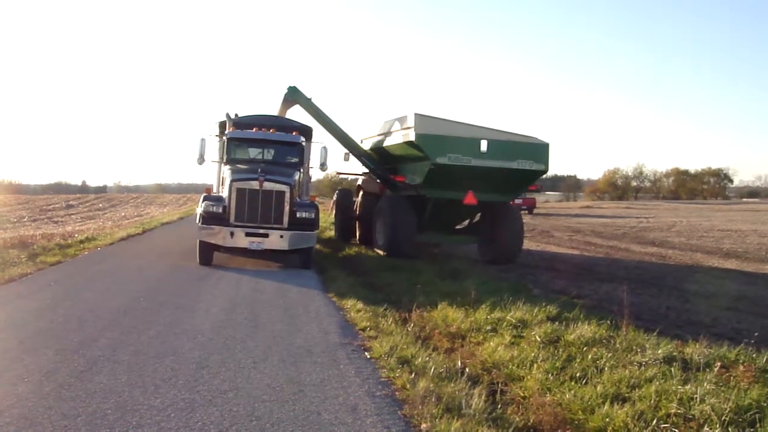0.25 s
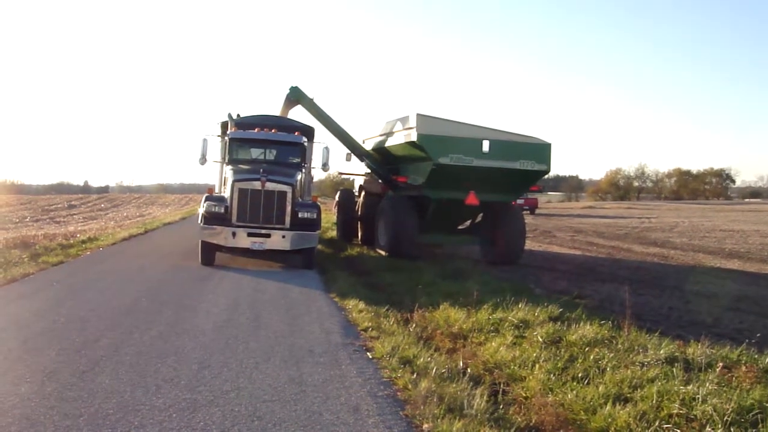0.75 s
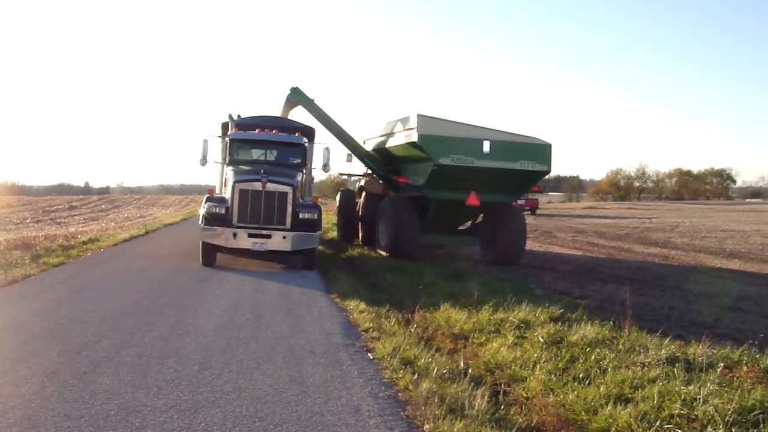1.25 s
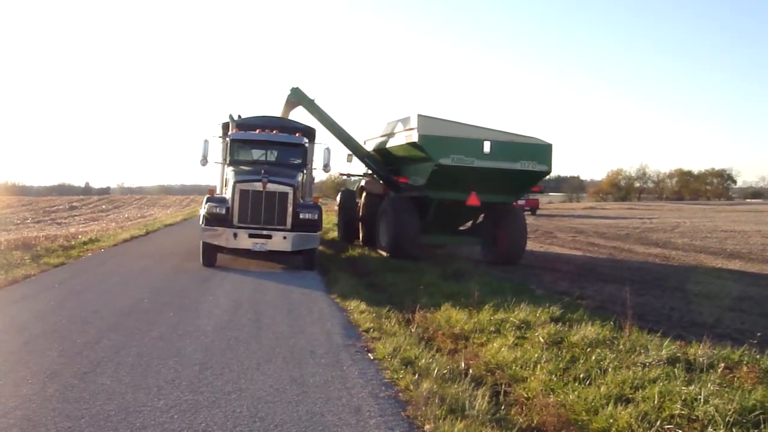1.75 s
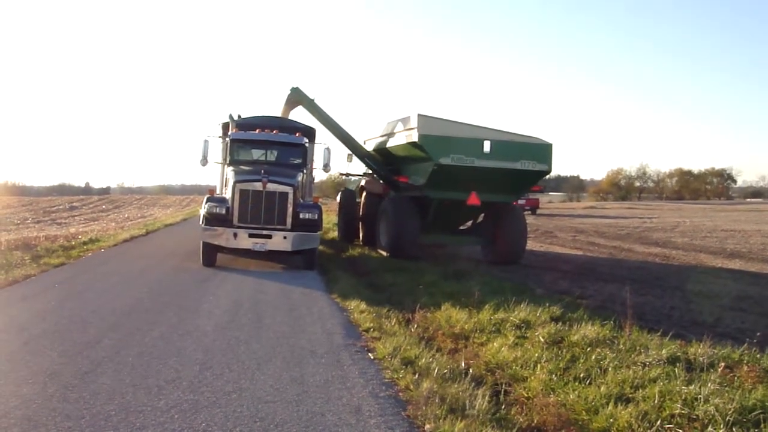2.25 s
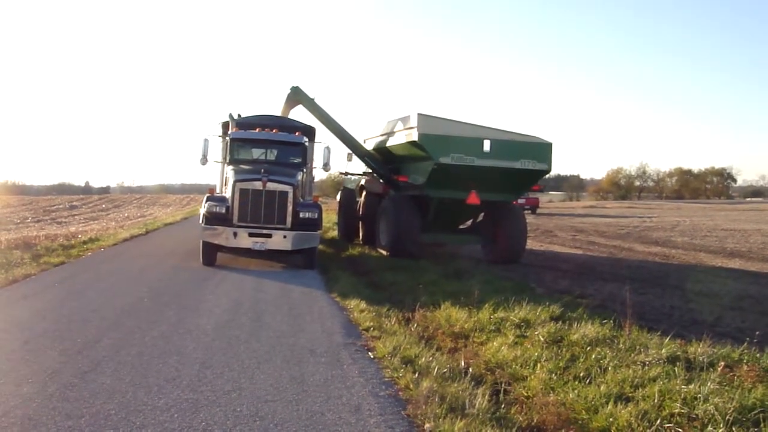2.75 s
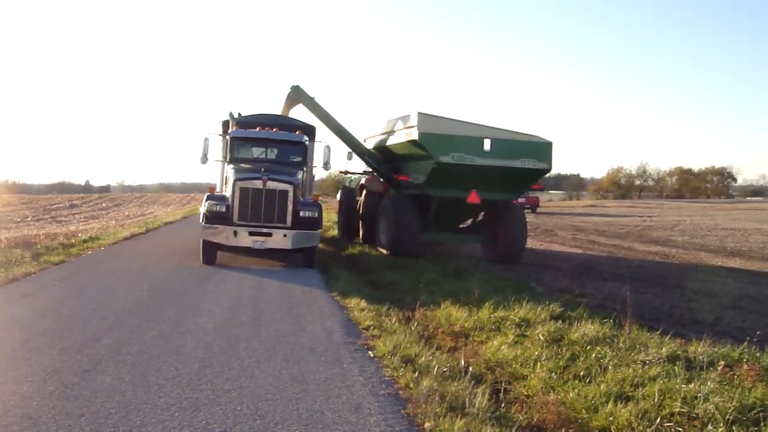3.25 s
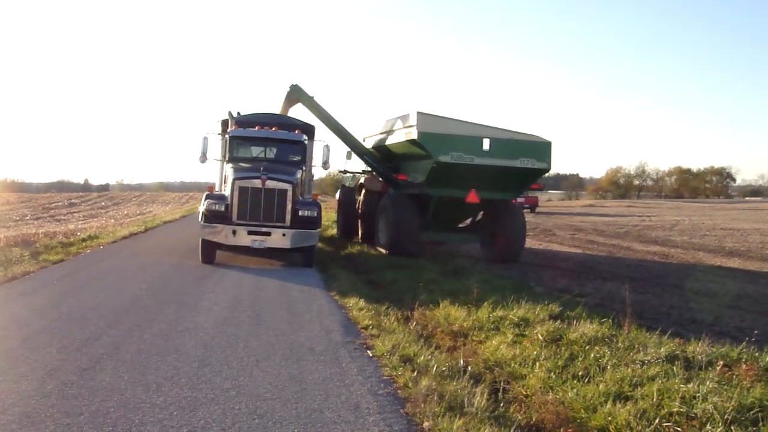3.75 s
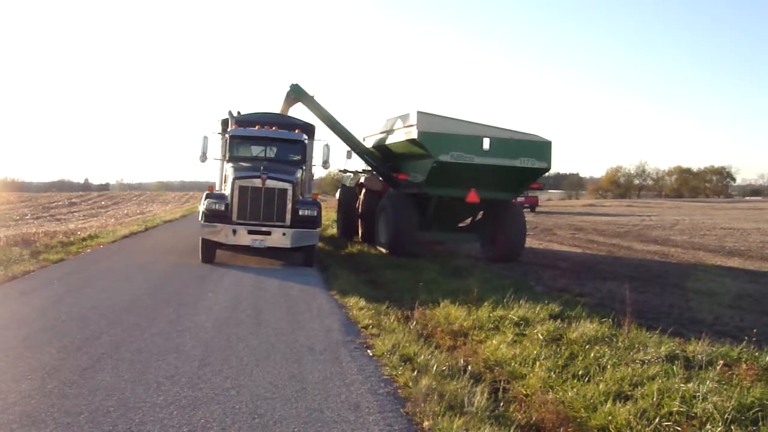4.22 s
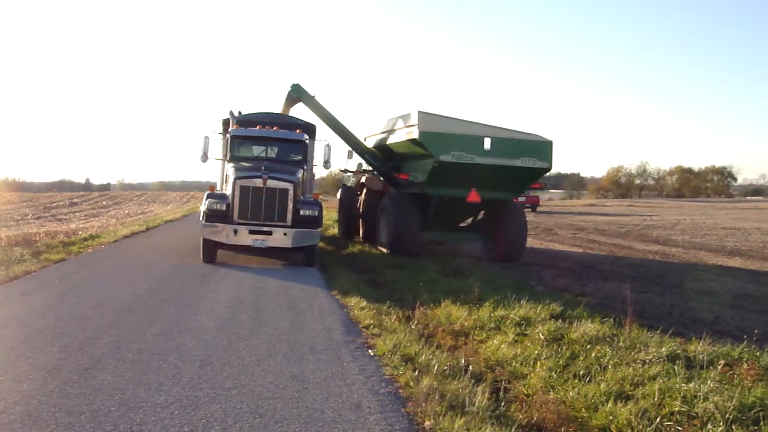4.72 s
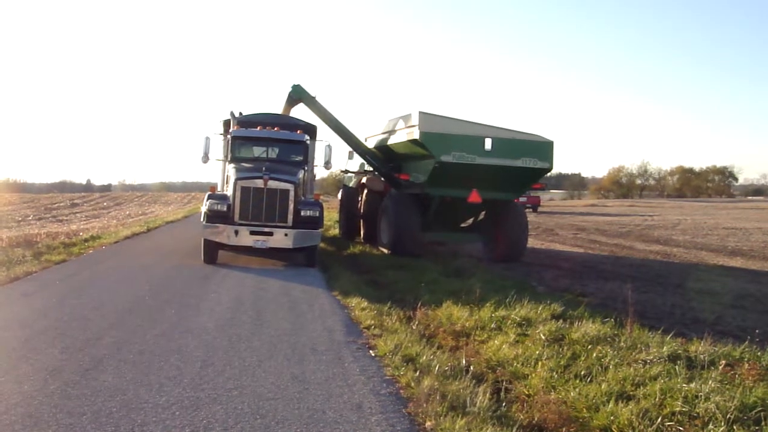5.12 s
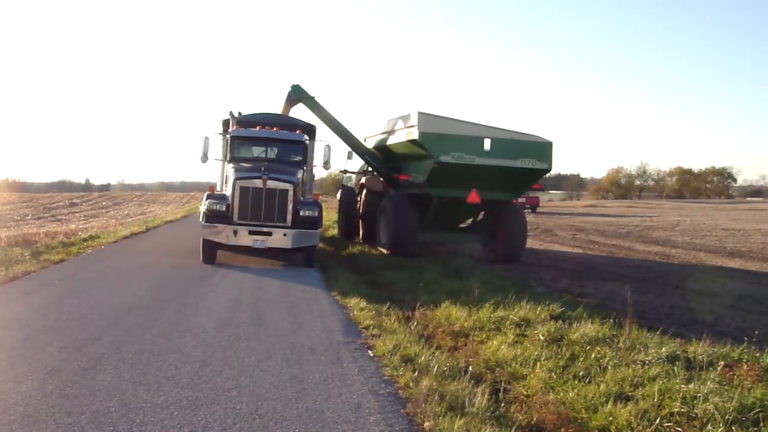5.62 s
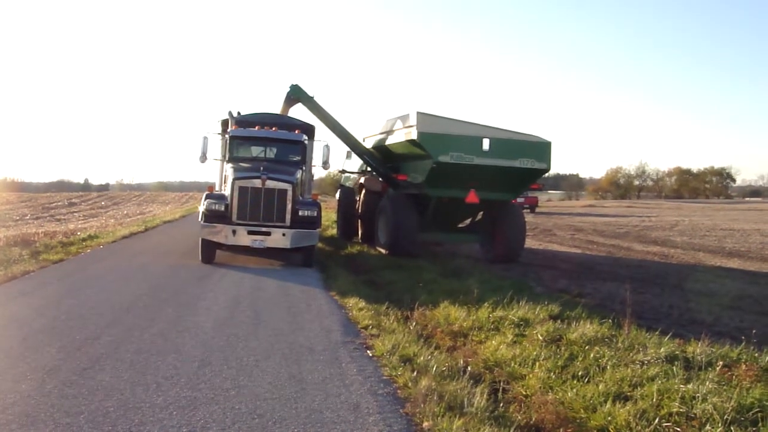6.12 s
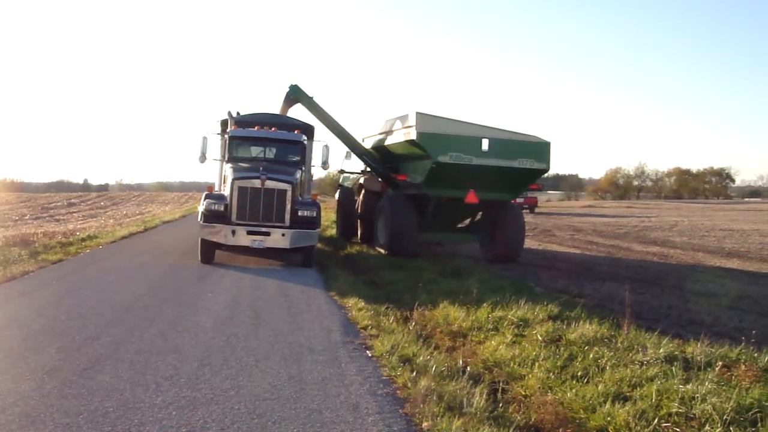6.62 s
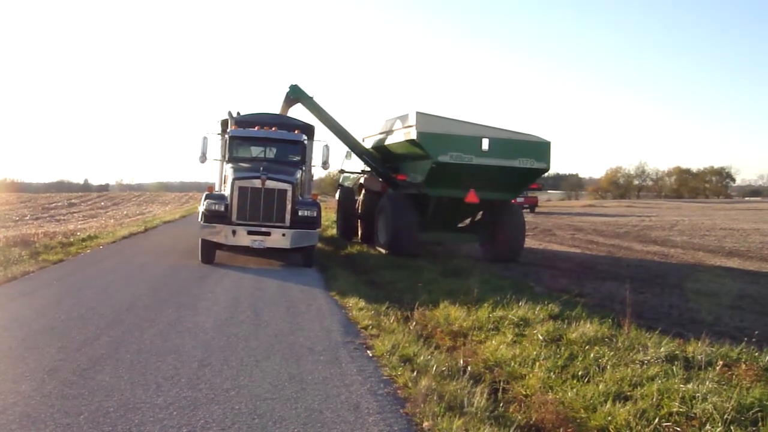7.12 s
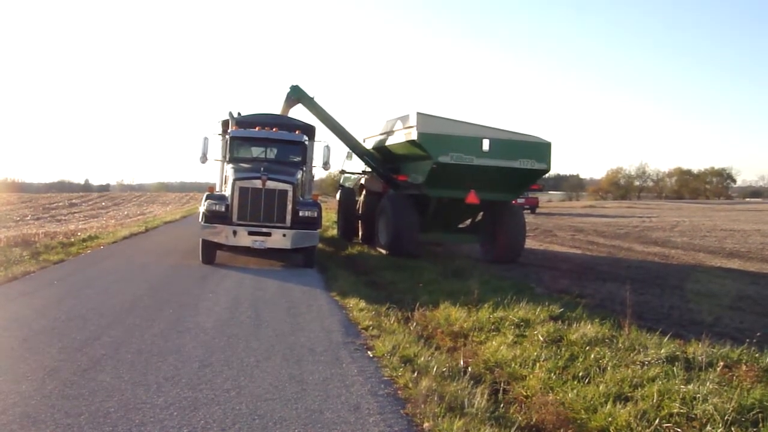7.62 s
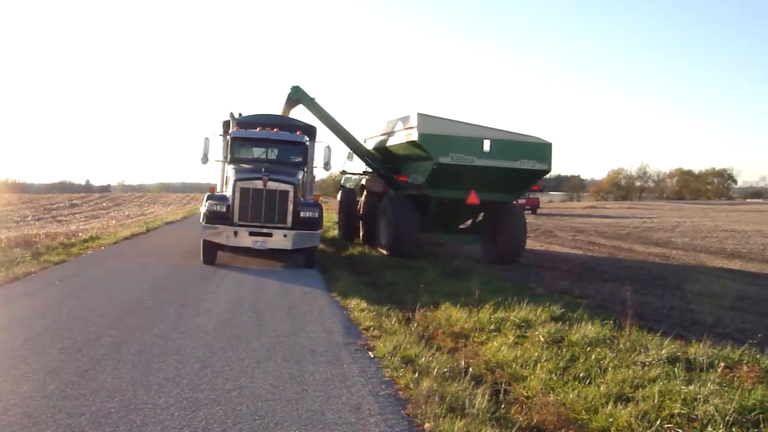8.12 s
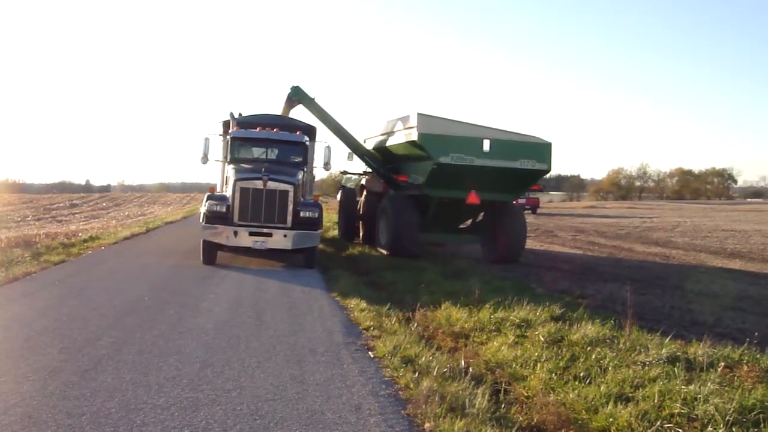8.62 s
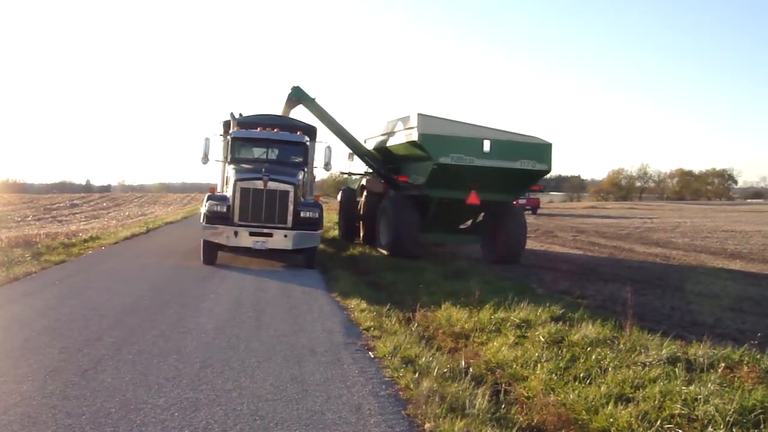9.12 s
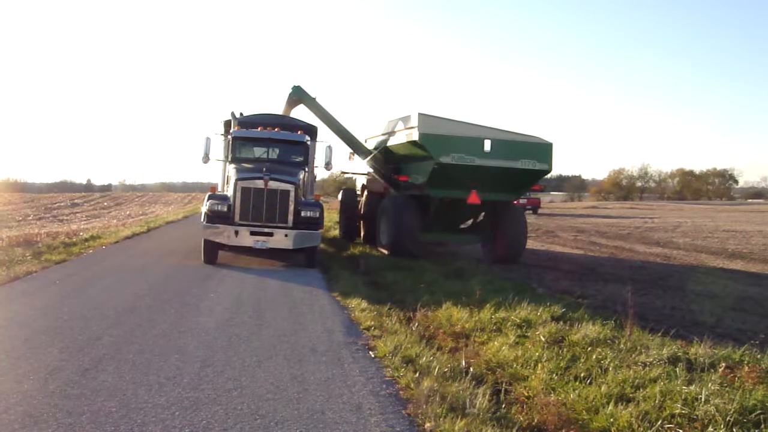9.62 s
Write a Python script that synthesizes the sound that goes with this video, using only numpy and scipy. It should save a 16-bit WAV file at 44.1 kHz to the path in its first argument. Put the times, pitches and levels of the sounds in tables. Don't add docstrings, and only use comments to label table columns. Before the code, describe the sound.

From 0 to almost 10 seconds a loud, dense hiss of dry beans striking steel fills the stereo field, bright but cut off at the very top, with a slight metallic colour and a subtle flutter about seven times a second as the auger turns. A faint cluster of steady gear whines, roughly 1 to 4 kHz, sits inside it. Light wind bumps open the scene, one clearer at 0.2. Small ringing knocks near 1 kHz occur irregularly, at about 1.1, 2.1 and 2.9, then in a regular run from 3.6 to 4.6. Low wind thumps cluster at 4.7 to 5.0, ducking the hiss briefly. Around 5.6 to 5.8 the whine sags slightly in pitch and stays lower. Another short gust thumps at 6.9 to 7.1, with the same dip. Sparse knocks continue, several near 7.3 to 8.2. A truck's low idle is nearly buried. The pouring continues unchanged to the end.

```python
import sys
import numpy as np
from scipy import signal
from scipy.fft import rfft, irfft, next_fast_len
from scipy.io import wavfile
from scipy.ndimage import uniform_filter1d

SR = 44100
rng = np.random.default_rng(int(sys.argv[2]) if len(sys.argv) > 2 else 0)


def transcribe(signal):
    frames = np.atleast_2d(signal).T
    limited = np.clip(frames, -1, 1)
    pcm = np.round(limited * 32767).astype(np.int16)
    wavfile.write(sys.argv[1], SR, pcm)


def nominal_scale(level):
    x = np.asarray(level, float) / 20
    return 10 ** x


N = 434826
SIZE = next_fast_len(N + SR // 2)
HZ = np.arange(1, SIZE // 2 + 2) * SR / SIZE
TEETH_PER_TURN = 27

# start_s, level_db (rms)
BREEZE_CURVE = [(0, -45), (1, -53), (3.5, -58), (4.5, -52), (6.3, -59), (7.4, -59), (9.86, -63)]


def in_time(rows):
    s, value = np.transpose(rows)
    return np.interp(np.arange(N) / SR, s, value)


def at_hz(points, hz, column=1):
    p = np.array(points, float)
    return np.interp(np.log(hz), np.log(np.maximum(p[:, 0], 1)), p[:, column])


def rms_one(x):
    return x / np.sqrt(np.mean(x ** 2) + 1e-20)


def drift(rate_hz):
    pole = np.exp(-80 * np.pi * rate_hz / SR)
    noise = rng.standard_normal(N // 40 + 2002)
    slow = signal.lfilter([1], [1, -2 * pole, pole * pole], noise)[2000:]
    return np.interp(np.arange(N) / 40, np.arange(len(slow)), rms_one(slow))


def beans(turn_rad):
    # pitch_hz, level_db (per Hz)
    hiss = [(18, -90), (30, -60), (60, -37), (205, -19), (420, -19), (475, -13), (859, -8), (948, -5),
            (1240, -8), (1800, -1), (2140, -9.5), (4600, -2.5), (10900, -12), (14200, -78), (22000, -120)]
    # pitch_hz, width_hz, gain_db
    steel = [(773, 70, 3), (980, 70, 1.5), (1066, 47, 4), (1280, 160, -2), (1595, 67, 3.5),
             (1661, 107, -8.5), (1800, 50, -2.5), (1860, 200, -1.5), (2240, 120, -1.5), (2410, 570, 4),
             (3370, 680, 0), (5140, 480, 0), (6700, 550, -1.5)]
    # pitch_hz, depth_db, phase_rad
    turn_swell = [(900, 0.5, -2.5), (1710, 0.5, 0), (3500, 0.5, 2.5), (7000, 0.5, 3.0)]
    colour_db = at_hz(hiss, HZ)
    for hz, width_hz, gain_db in steel:
        colour_db = colour_db + gain_db / (1 + (2 * (HZ - hz) / width_hz) ** 2)
    hail = rfft(rng.standard_normal((2, SIZE))) * nominal_scale(colour_db)
    surge_db = 0.24 * drift(4.7) + 0.38 * drift(24.0)
    out = 0
    for centre_hz in 30 * 2 ** np.arange(0, 9, .5):
        share = np.clip(1 - 2 * np.abs(np.log2(HZ / centre_hz)), 0, 1)
        phase_rad = at_hz(turn_swell, centre_hz, column=2)
        swell_db = at_hz(turn_swell, centre_hz) * np.cos(turn_rad + phase_rad)
        flicker_db = 0.16 * drift(5.0)
        out = out + irfft(hail * share, SIZE)[:, :N] * nominal_scale(swell_db + surge_db + flicker_db)
    return rms_one(out) * nominal_scale(-16.36)


def gearbox(mesh_hz, turn_rad):
    multiples = [2, 3, 4, 4.76, 5, 6, 7, 8, 8.13, 11, 13, 14, 16, 18, 19]
    # light_db (rms), loaded_db (rms), swell_per_turn (0-1)
    whine = [(-58, -52, 0.4), (-50, -49, 0.55), (-46.5, -41, 0.06), (-62, -43, 0), (-37.5, -36, 0.16),
             (-52, -42.5, 0.6), (-45.5, -44, 0.34), (-57, -63, 0.1), (-46, -47, 0.4), (-49, -43, 0),
             (-43, -43, 0.7), (-39, -38, 0.08), (-39, -59, 0), (-42, -47, 0.6), (-45, -49, 0.1)]
    strong = [(4.89, .1), (9, .22), (10, .25), (12, .5)]
    speeds_hz = [
        193.5,
        194.2,
        196.7,
    ]
    # heavy_db, eased_db, light_db (rms)
    strong_at_db = [(-40.5, -37, -45), (-37.5, -38, -30.3), (-36.5, -46, -40), (-37.5, -37, -43)]
    strong_wander_db = [1.2, .5, 1.2, 1.3]
    light_hz, loaded_hz = 196.6, 194.6
    load = np.clip((light_hz - mesh_hz) / (light_hz - loaded_hz), 0, 1)
    out = 0
    for multiple, (light_db, loaded_db, swell) in zip(multiples, whine):
        out = out + tone(multiple, light_db + load * (loaded_db - light_db), swell, turn_rad)
    for (multiple, swell), at_speeds_db, wander_db in zip(strong, strong_at_db, strong_wander_db):
        level_db = np.interp(mesh_hz, speeds_hz, at_speeds_db) + wander_db * drift(0.83)
        out = out + tone(multiple, level_db, swell, turn_rad)
    return out


def tone(multiple, level_db, swell, turn_rad):
    level = nominal_scale(level_db + 0.8 * drift(2.8))
    level = level * (1 + swell * np.cos(turn_rad + rng.uniform(0, 2 * np.pi)))
    phase_rad = multiple * TEETH_PER_TURN * turn_rad + 0.36 * drift(8.8)
    return np.sqrt(2) * level * np.sin(phase_rad + rng.uniform(0, 2 * np.pi))


def tube():
    # start_s, level_db (peak)
    knocks = [(.715, -24), (1.0, -23), (1.134, -17), (2.095, -18), (2.39, -21), (2.915, -17), (3.06, -25),
              (3.6, -21), (3.73, -21), (3.87, -22), (4.02, -18), (4.16, -21), (4.28, -23), (4.422, -16),
              (4.555, -22), (5.52, -22), (5.925, -20), (6.495, -23), (6.775, -18), (7.34, -21), (7.63, -21),
              (7.752, -22), (7.877, -17), (8.16, -18), (9.835, -21)]
    # pitch_hz, level_db, t60_s
    modes = [(1084, -2, 0.15), (946, -15, 0.17), (1630, -17, .07)]
    clicks = np.zeros(N) + 1e-18
    for start_s, peak_db in knocks:
        clicks[round(start_s * SR)] = nominal_scale(peak_db)
    out = 0
    for hz, level_db, t60_s in modes:
        pole, w = nominal_scale(-60 / (t60_s * SR)), 2 * np.pi * hz / SR
        strike = [0, nominal_scale(level_db) * np.sin(w)]
        out = out + signal.lfilter(strike, [1, -2 * pole * np.cos(w), pole * pole], clicks)
    return out


def truck():
    # pitch_hz, level_db (rms)
    idle = [(70.3, -59.5), (121, -64), (140.6, -60), (211, -60.5)]
    t = np.arange(N) / SR
    out = 0
    for hz, level_db in idle:
        level = np.sqrt(2) * nominal_scale(level_db + 3.3 * drift(2.6))
        out = out + level * np.sin(2 * np.pi * hz * t + 0.28 * drift(3.1))
    return out


def eddies():
    # start_s, level_db (peak)
    main = np.array([(.01, -27), (.18, -19.5), (.515, -31), (.716, -31.5), (1.755, -28), (2.167, -30),
                     (2.53, -30), (2.916, -33), (3.461, -31), (4.675, -19), (4.733, -20), (4.751, -13),
                     (4.799, -15), (4.829, -17.5), (4.854, -14), (4.877, -10), (4.902, -18), (4.922, -10),
                     (4.944, -9.5), (4.988, -24), (5.045, -25), (6.883, -26.5), (6.921, -9.5),
                     (6.944, -12.5), (6.972, -11), (7.011, -22), (7.058, -16), (7.219, -30)])
    shed_s, shed_loss_db = 0.0147, 8
    shed = main + [shed_s, -shed_loss_db] * rng.uniform(0.65, 1.28, main.shape)
    strays, over_breeze_db = 24, 17
    stray_s = rng.uniform(0, N / SR, strays)
    stray_db = np.interp(stray_s, *np.transpose(BREEZE_CURVE)) + over_breeze_db
    stray_db = stray_db + rng.normal(0, 3.3, strays)
    rows = np.vstack([main, shed, np.transpose([stray_s, stray_db])])
    # 286 Hz at 0 dB, 3.5 Hz per dB
    hz = (286 + 3.5 * rows[:, 1]) * (1 + 0.077 * rng.standard_normal(len(rows)))
    return np.column_stack([rows, hz])


def wind(puffs):
    half = 1024
    thumps, wake = np.zeros(N + 2 * half), np.zeros(N)
    t = np.arange(-half, half) / SR
    for (start_s, peak_db, hz), phase_rad in zip(puffs, rng.normal(0, 1, len(puffs))):
        at = round(start_s * SR)
        sagging_rad = 2 * np.pi * hz * t * (1 - 0.13 * hz * t)
        thump = nominal_scale(peak_db) * np.exp(-(t * hz / 0.72) ** 2) * np.cos(sagging_rad + phase_rad)
        thumps[max(at - half, 0):at + half] += thump[max(half - at, 0):]
        wake[at] = nominal_scale(peak_db)
    wake = uniform_filter1d(uniform_filter1d(wake, size=1200), size=1200) * 1200
    flutter = nominal_scale(in_time(BREEZE_CURVE) + 6.8 * drift(6.5)) + nominal_scale(-20.5) * wake
    band = signal.butter(2, [70, 300], "band", fs=SR, output="sos")
    rumble = rms_one(signal.sosfilt(band, rng.standard_normal((2, N)))) * flutter
    opposed = nominal_scale([[1.3], [-1.5]]) * [[1], [-1]]
    return (thumps[:N] + rumble[0]) * opposed + nominal_scale(-14.5) * rumble[1]


def ports(direct, scattered):
    # pitch_hz, likeness (0-1), left_minus_right_db, left_lead_rad
    housing = [(60, .85, 3, 0), (230, .66, 5, -.1), (600, .9, 3, -.4), (1050, .95, 2.7, -.4),
               (1300, .92, 0, -.25), (1900, .955, 0, -.1), (3300, .945, .2, 0), (3750, .92, 2.6, -.18),
               (4400, .94, 1.5, -.3), (5350, .93, -2, -.43), (6050, .88, -4, -.13), (6400, .8, -6, .35),
               (7300, .88, -.8, .72), (9000, .85, 3.1, .45), (11000, .83, 3, .2)]
    alike = at_hz(housing, HZ)
    side = np.array([[.5], [-.5]])
    lean = nominal_scale(side * at_hz(housing, HZ, column=2))
    lead = np.exp(1j * side * at_hz(housing, HZ, column=3))
    shared = np.sqrt(1 + alike) * rfft(direct, SIZE)
    differing = 2 * side * np.sqrt(1 - alike) * rfft(scattered, SIZE)
    return irfft(lean * lead * (shared + differing) / np.sqrt(2), SIZE)[:, :N]


def recorder_gain_db(puffs):
    leak_s, grab_s = 0.11, 0.012
    pull_db, knee_db = 4.5, 0.74
    pressure = np.zeros(N) + 1e-18
    np.add.at(pressure, (puffs[:, 0] * SR).astype(int), nominal_scale(0.77 * puffs[:, 1]))
    leak, grab = np.exp(-1 / (leak_s * SR)), np.exp(-1 / (grab_s * SR))
    pile = signal.lfilter([1], [1, -leak], pressure)
    pile = signal.lfilter([1 - grab], [1, -grab], pile)
    return -0.04 * drift(1.6) - np.maximum(pull_db * pile - knee_db, 0)


def scene():
    # start_s, mesh_hz
    mesh = [(0, 197.2), (1.9, 197.2), (2.2, 196.97), (3.2, 196.86), (3.9, 197.3), (5.0, 197.2),
            (5.62, 196.5), (5.82, 193.45), (6.7, 193.4), (6.9, 194.0), (7.75, 194.2), (8.1, 193.52),
            (8.4, 193.55), (8.65, 193.93), (9.4, 194.45), (9.86, 194.55)]
    mesh_hz = in_time(mesh)
    turn_rad = 2 * np.pi * np.cumsum(mesh_hz) / SR / TEETH_PER_TURN
    direct, scattered = beans(turn_rad)
    machine = direct + gearbox(mesh_hz, turn_rad) + tube() + truck()
    puffs = eddies()
    return ports(machine, scattered) * nominal_scale(0.5 + recorder_gain_db(puffs)) + wind(puffs)


def band_limit(x):
    return signal.sosfilt(signal.butter(12, 11010, fs=SR, output="sos"), x)


def record(dry):
    thin = signal.sosfilt(signal.butter(2, 80, "high", fs=SR, output="sos"), dry)
    return band_limit(thin)


dry = scene()
out = record(dry)
transcribe(out)
```